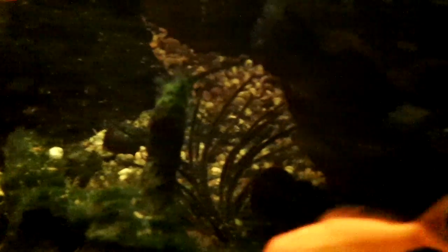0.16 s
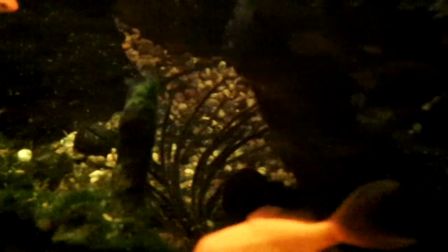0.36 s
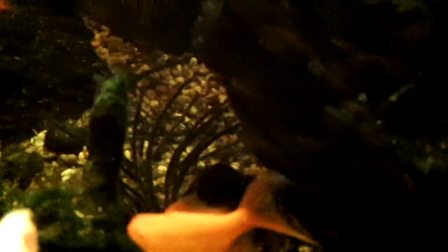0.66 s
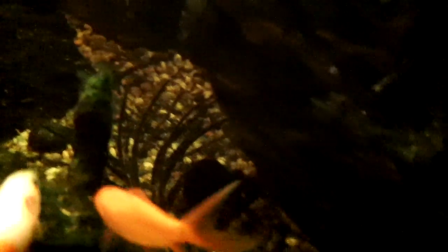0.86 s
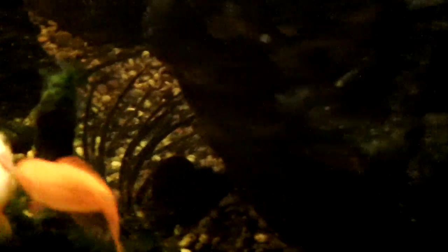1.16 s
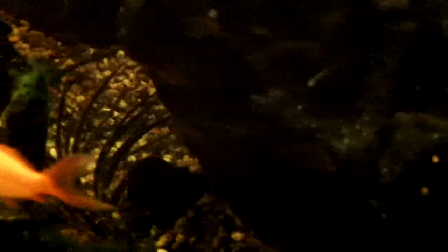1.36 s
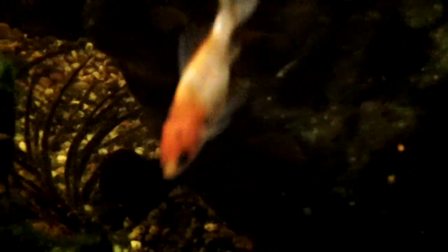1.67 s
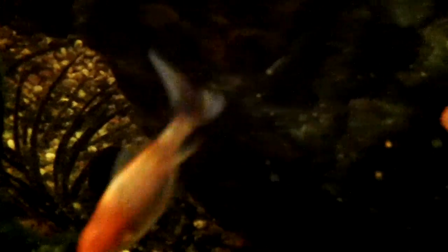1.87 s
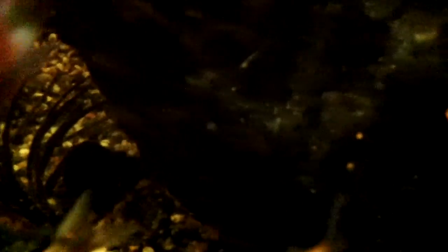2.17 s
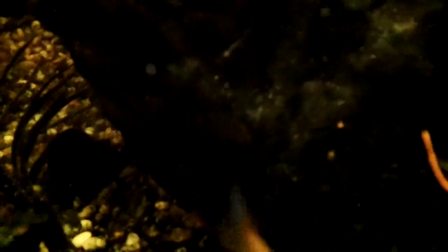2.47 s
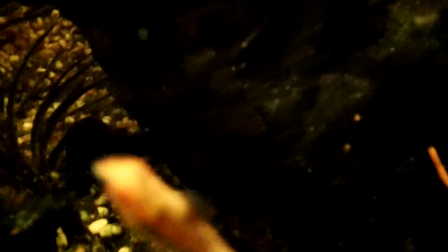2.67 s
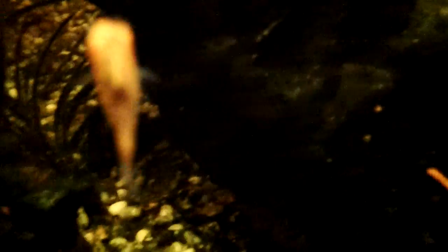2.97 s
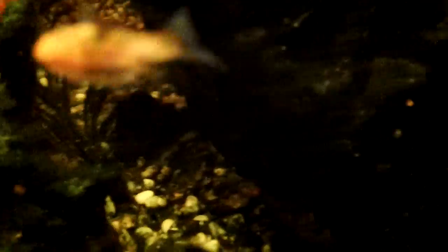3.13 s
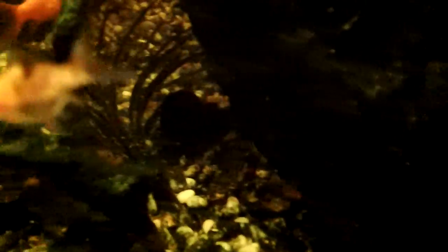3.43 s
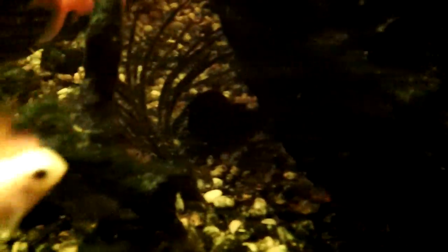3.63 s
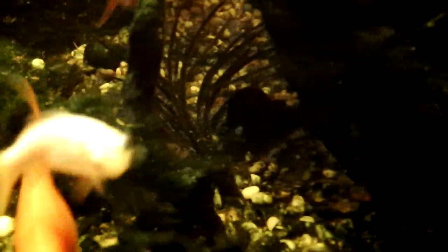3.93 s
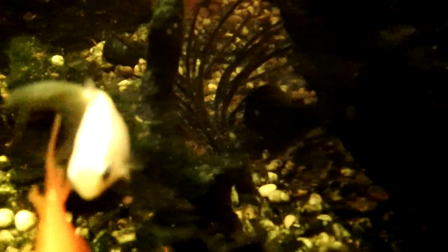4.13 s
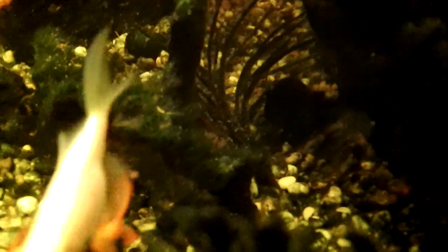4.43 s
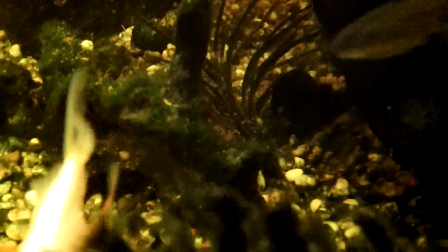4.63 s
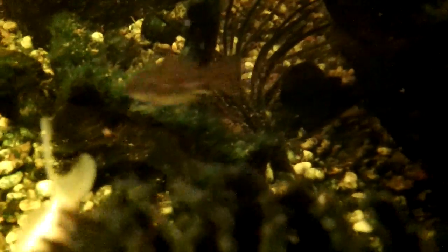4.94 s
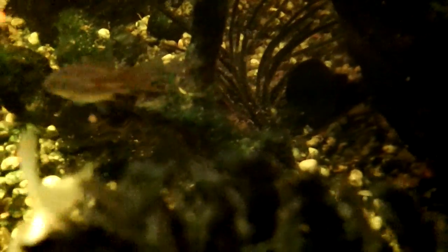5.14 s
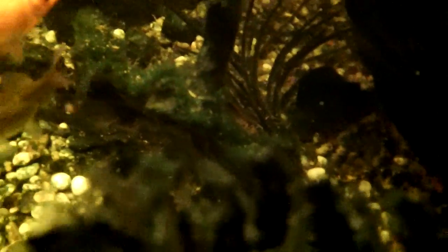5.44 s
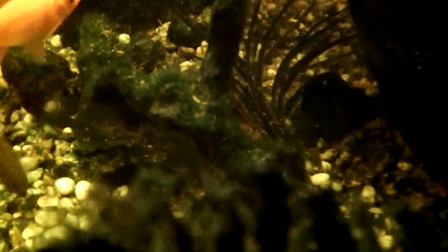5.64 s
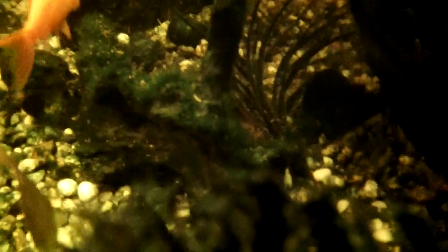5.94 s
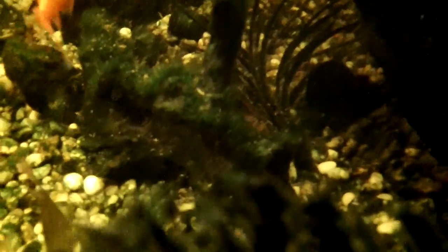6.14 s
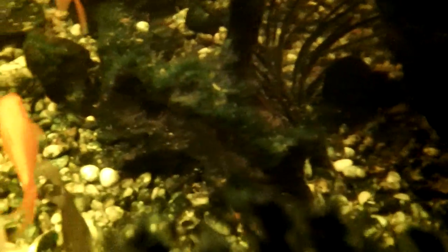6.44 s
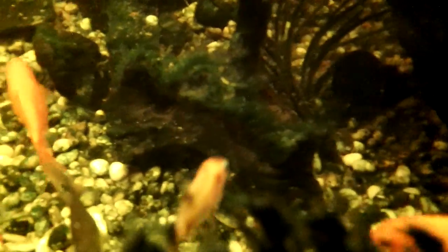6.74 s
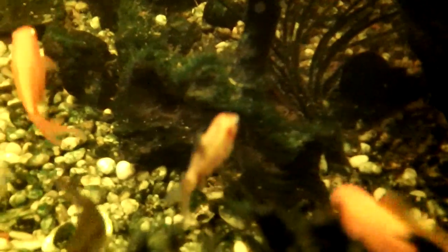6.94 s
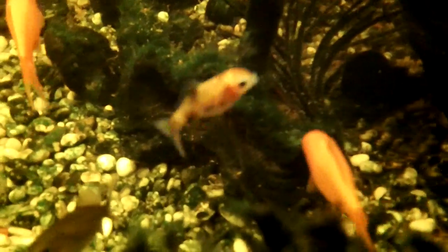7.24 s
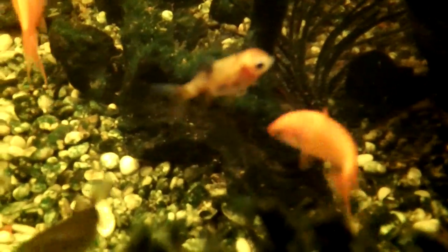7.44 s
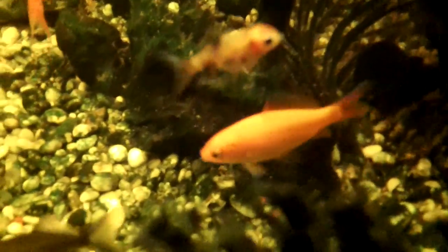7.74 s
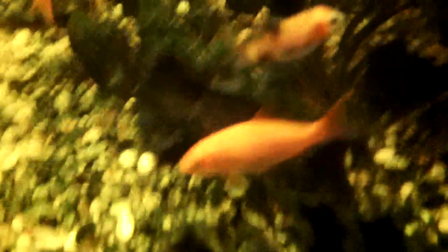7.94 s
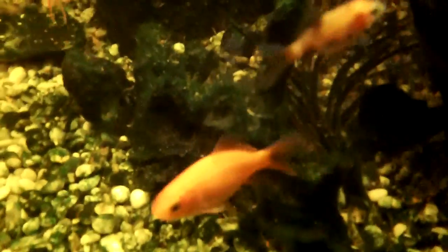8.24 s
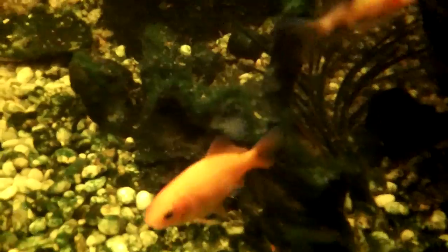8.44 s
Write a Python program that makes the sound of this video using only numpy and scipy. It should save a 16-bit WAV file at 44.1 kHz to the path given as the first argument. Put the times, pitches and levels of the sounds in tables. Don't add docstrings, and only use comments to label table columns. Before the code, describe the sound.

A fish tank pump runs throughout: a steady low electric hum, strongest around 100 hertz, with a boxy, gently gurgling resonance of water and glass above it, low rumble, faint soft hiss and a barely perceptible high whine. The microphone is close, handheld and sealed in a housing, so the sound is muffled. From 0 to 2.5 seconds, deep soft handling bumps and slow pressure wobbles make the hum dip and flutter. It runs mostly evenly until small jolts near 4.5. At about 5.0 a hard thump strikes the housing, followed by more from 5.5 to 7.3, densest after 6, several with bright fingernail clicks and a short hollow ring. Each strong one makes the hum drop abruptly, then climb back within a fraction of a second in fine steps. After 7.3 it calms; a low jolt at 8.0 precedes a last knock at 8.1, and the hum recovers until the end at about 8.6.

```python
import sys
import numpy as np
from scipy import signal
from scipy.fft import rfft, irfft
from scipy.io import wavfile
from scipy.ndimage import uniform_filter1d

SR = 44100
rng = np.random.default_rng(int(sys.argv[2]) if len(sys.argv) > 2 else 0)


def store_wav(level_fs):
    pcm = np.round(np.clip(np.atleast_2d(level_fs), -1, 1) * 32767)
    wavfile.write(sys.argv[1], SR, pcm.T.astype(np.int16))


def convert_level_to_amplitude(level_db):
    exponent = np.asarray(level_db, float) / 20
    return 10 ** exponent


N = 379260
TIME_S = np.arange(N) / SR
TICK_HZ = 750.0


def evened(x):
    return x / np.sqrt(np.mean(x ** 2) + 1e-20)


def read(points, hz):
    f, value = np.transpose(points)
    return np.interp(np.log(hz + 1), np.log(f + 1), value)


def coloured(gain):
    hz = np.fft.rfftfreq(N, 1 / SR)
    return evened(irfft(rfft(rng.standard_normal(N)) * gain(hz), N))


def drift(rate_hz):
    return coloured(lambda hz: 1 / (1 + (hz / rate_hz) ** 2))


def add(mix, s, sound):
    part = mix[round(s * SR):][:len(sound)]
    part += sound[:len(part)]


def sine(hz, rms_db):
    return np.sqrt(2) * convert_level_to_amplitude(rms_db) * np.sin(2 * np.pi * hz * TIME_S)


def hum():
    mains_hz = 49.9
    # (multiple of the mains, rms [dB], wander [dB])
    lines = [(1, -33.5, 6.5), (2, -21.5, -1.45), (3, -32, 2), (4, -38, 2), (6, -33.5, 5), (8, -37.5, 7),
             (10, -31.5, 0)]
    turn = 2 * np.pi * mains_hz * TIME_S
    out = np.zeros(N)
    for k, db, wander_db in lines:
        level = np.sqrt(2) * convert_level_to_amplitude(db + wander_db * drift(6.3))
        out += level * np.sin(k * turn + 2 * np.pi * rng.random())
    return out


def tank():
    # (frequency [Hz], width [Hz], level [dB])
    resonances = [(74.1, 20, 3.5), (149.5, 47, -4), (185.2, 51, -4.5), (252.5, 16, 1), (284.7, 83, 1.5),
                  (383.5, 32, -3), (449, 98.3, 1.5), (444, 14, -4.5), (491, 120, -7.5), (553, 23, -24.5),
                  (696, 220, -23), (800.6, 105, -18), (945, 68, -25.5), (1162, 120, -34),
                  (1240, 660, -38.5)]
    level_db, gurgle_db, gurgle_hz = -20.5, 0.99, 12.0

    def modes(hz):
        power = sum((convert_level_to_amplitude(db) / (1 + (2 * (hz - f) / w) ** 2)) ** 2 for f, w, db in resonances)
        return np.sqrt(power)
    return convert_level_to_amplitude(level_db + gurgle_db * drift(gurgle_hz)) * coloured(modes)


def knocks():
    # (time [s], blow [dB], ring [dB], recoil share of blow [1], fingernail tick [dB])
    blows = [(4.9548, 21, 20.5, 0.054, -42), (5.5377, 9.5, 13.5, 0.013, -15.5),
             (5.7452, 23, 23, 0.45, -2.5), (5.9841, 25, 21.5, 0.1, -25.5), (6.3053, 22.5, 24.5, 0.29, -3),
             (6.404, 0, 1.5, 0.0091, -63), (6.4856, 6, 8, 0.013, -44), (6.6997, 26, 34, 0.33, -1),
             (6.9034, 23, 30.5, 0.26, -1), (6.9732, 12, 17, 0.0079, -62), (7.1543, 22.5, 24, 0.25, -2.5),
             (7.259, 4, 13, .01, -49), (8.1142, 4.5, 7.5, 0.14, -9.5)]
    # (frequency [Hz], level [dB], t60 [s])
    housing = [(422, -0.5, .06), (491, 0.05, .065), (568, -25, 0.097), (301, -12.5, 0.02),
               (778, -4.5, 0.015)]
    recoil_s, lead_s, push_s = .0007, .0004, .0008
    rebound_share, rebound_s = 0.29, .005
    out, t = np.zeros(N), np.arange(SR // 5) / SR
    late = np.maximum(t - lead_s, 0)

    def swing(peak_s):
        return (late / peak_s) ** 2 * np.exp(2 - 2 * late / peak_s)

    recoil = -np.sin(np.pi * np.clip(t / recoil_s, 0, 1)) ** 2
    push = swing(push_s)
    partials = [(2000, 0.75), (3150, 1.01), (5200, .5), (9500, 0.17)]  # Hz, share
    tick = sum(share * np.sin(2 * np.pi * hz * t) for hz, share in partials)
    tick *= convert_level_to_amplitude(-60 * t / 0.0062) * (1 - np.exp(-t / 0.0001))
    ring = sum(convert_level_to_amplitude(db - 60 * late / t60) * np.sin(2 * np.pi * hz * (late - .0005))
               for hz, db, t60 in housing)
    ring *= (1 - np.exp(-(late / .0011) ** 2)) / 2
    ring -= rebound_share * swing(rebound_s)
    for s, blow_db, ring_db, share, tick_db in blows:
        blow = convert_level_to_amplitude(blow_db) * (share * recoil + push)
        add(out, s - lead_s, blow + convert_level_to_amplitude(ring_db) * ring + convert_level_to_amplitude(tick_db) * tick)
    return out


def upset(t):
    # (time [s], depth [dB], fall [s])
    upsets = [(.0, 2.5, 0.067), (.37, 6.5, 0.062), (1.062, 7.5, 0.024), (1.18, 7, 0.12), (1.41, 5, 0.019),
              (1.492, 9, .07), (2.148, 4, 0.13), (2.426, 11, .03), (2.498, 5.5, .05), (4.492, 6, .03),
              (4.541, 6.5, 0.063), (4.953, 32.5, 0.006), (5.537, 7.5, 0.01), (5.745, 34, 0.023),
              (5.982, 29, 0.003), (6.157, 11, 0.0054), (6.21, 11.5, .01), (6.303, 23, 0.005),
              (6.406, 25.5, 0.011), (6.485, 26, 0.0059), (6.701, 36, 0.035), (6.901, 29.5, 0.012),
              (6.975, 19, .01), (7.085, 13, .012), (7.153, 22.5, 0.013), (7.261, 21.5, 0.0087),
              (7.987, 3.5, 0.0086), (8.121, 30, 0.018), (8.251, 17, .04)]
    climb_db_per_s, ease_db = 120.5, 3.5
    s, depth_db, fall_s = np.transpose(upsets)[:, :, None]
    climbing_s = np.maximum(t - s - fall_s, 0)
    left = np.expm1(depth_db / ease_db) * np.exp(-climb_db_per_s * climbing_s / ease_db)
    fallen = np.clip((t - s) / fall_s, 0, 1)
    return (fallen * ease_db * np.log1p(left)).max(axis=0)


def sway():
    # (time [s], rms [dB])
    wobble = [(0, -5), (.2, -18), (.9, -11.5), (1.45, -9.5), (2.0, -22), (2.3, -13), (2.8, -23), (3.5, -17),
              (4.25, -20.5), (4.6, -8), (4.9, -21.5), (5.55, -17), (6.02, -26), (6.5, -20.5), (7.3, -7.5),
              (7.55, -19), (8.1, -6), (8.6, -39)]
    sway_hz, spread_hz, level_db = 16.5, 3.0, -7.5
    shake_share = 0.87
    s, db = np.transpose(wobble)
    slow_s = np.arange(0, N / SR, 1 / TICK_HZ)
    shake_db = shake_share * uniform_filter1d(upset(slow_s), size=30)
    sway_db = np.interp(TIME_S, slow_s, np.interp(slow_s, s, db) + shake_db)
    turn = 2 * np.pi * np.cumsum(sway_hz + spread_hz * drift(4.0)) / SR
    return np.sqrt(2) * convert_level_to_amplitude(sway_db + level_db) * np.sin(turn)


def jolts():
    # (time [s], peak [dB], frequency [Hz], t60 [s], direction [+1 or -1])
    jerks = [(0.372, -7.5, 11, 0.48, -1), (1.06, 7.5, 21, 0.09, 1), (1.492, -2.5, 35, 0.66, 1),
             (1.44, -18, 24, .15, -1), (1.52, 2.5, 28, 0.13, -1), (2.397, -2, 17, 0.75, 1),
             (4.491, -25, 16, 0.18, 1), (6.1, 3, 11, 0.88, 1), (6.448, 13, 13, 0.2, 1),
             (6.483, 21.5, 20, 0.22, -1), (6.485, 23.5, 66, 0.08, -1), (6.345, 0.5, 16, 0.33, -1),
             (6.746, -1, 12.4, 0.25, 1), (6.94, 19, 18, 0.2, -1), (7.07, 8, 14, 0.24, 1),
             (1.205, -3.5, 8.1, 0.27, 1), (1.396, -5.5, 12, 0.11, 1), (7.978, 10, 32, 0.11, 1),
             (8.107, 8.5, 20, 0.37, 1), (8.124, 11.5, 15, 0.72, -1)]
    out, t = np.zeros(N), np.arange(SR // 2) / SR
    onset = 1 - np.exp(-t / 0.012)
    for s, db, hz, t60, direction in jerks:
        add(out, s, direction * convert_level_to_amplitude(db - 60 * t / t60) * np.sin(2 * np.pi * hz * t) * onset)
    return out


def rumble():
    # (frequency [Hz], density [dB per Hz])
    spectrum = [(5, -37), (12, -14.5), (22, 19.5), (32, 20.5), (48, 1.5), (70, -4), (88, -21), (115, -37)]
    return convert_level_to_amplitude(-32.5) * coloured(lambda hz: convert_level_to_amplitude(read(spectrum, hz)))


def hiss():
    # (frequency [Hz], density [dB per Hz])
    spectrum = [(300, -5), (1000, -5), (1600, 14), (2400, 10.5), (3400, 7.5), (4400, 3), (5600, -18.5),
                (7000, -27), (10000, -20), (14000, -20.5)]
    return convert_level_to_amplitude(-58 + 1.0 * drift(40.0)) * coloured(lambda hz: convert_level_to_amplitude(read(spectrum, hz)))


def whine():
    # (frequency [Hz], rms [dB])
    tones = [(7650, -78), (7710, -79)]
    return sum(sine(hz, db) for hz, db in tones)


def scene():
    return (hum() + tank() + knocks() + sway() + jolts() + rumble() + hiss() + whine())[None]


def stepped_gain(dry):
    step_db, rest_db = .75, -2
    limit_db, release_db_per_s = -11, 400
    tick = np.arange(int(N / SR * TICK_HZ))
    at = (tick * SR / TICK_HZ).astype(int)
    peak_db = 20 * np.log10(np.maximum.reduceat(abs(dry), at) + 1e-9)
    release_db = tick * release_db_per_s / TICK_HZ
    peak_db = np.maximum.accumulate(peak_db + release_db) - release_db
    goal = np.minimum(rest_db - upset(at / SR), limit_db - peak_db) / step_db
    steps, level = np.zeros(len(tick)), np.round(goal[0])
    for k in tick:
        steps[k] = level
        if goal[k] <= level - 12:
            level -= np.ceil((level - goal[k] - 5) * .75)
        elif goal[k] < level - 1:
            level -= 1
        elif k % 4 == 0 and goal[k] > level:
            level += 1
    now = np.searchsorted(at, np.arange(N), "right") - 1
    dive = np.diff(steps, append=level)[now] < -1
    merged = np.interp(np.arange(N), at, steps)
    return convert_level_to_amplitude(step_db * np.where(dive, merged, steps[now]))


def roll_off(x):
    return signal.sosfilt(signal.butter(12, 15620, fs=SR, output="sos"), x)


def record(dry):
    # (frequency [Hz], gain [dB])
    colour = [(6000, 0), (7400, -4), (8000, -13), (8600, -4), (11700, -1), (11950, -10), (12300, -1),
              (14300, -2), (14700, -8), (15600, -14), (16600, -40)]
    converter_db = -88
    x = np.clip(dry * stepped_gain(dry[0]), -1, 1)
    x = x + convert_level_to_amplitude(converter_db) * rng.standard_normal(dry.shape)
    x = irfft(rfft(x) * convert_level_to_amplitude(read(colour, np.fft.rfftfreq(N, 1 / SR))), N)
    return roll_off(np.clip(x, -1, 1))


dry = scene()
out = record(dry)
store_wav(out)
```